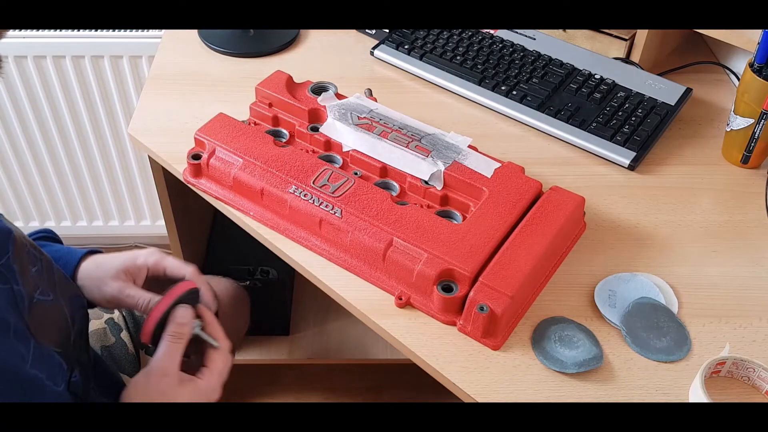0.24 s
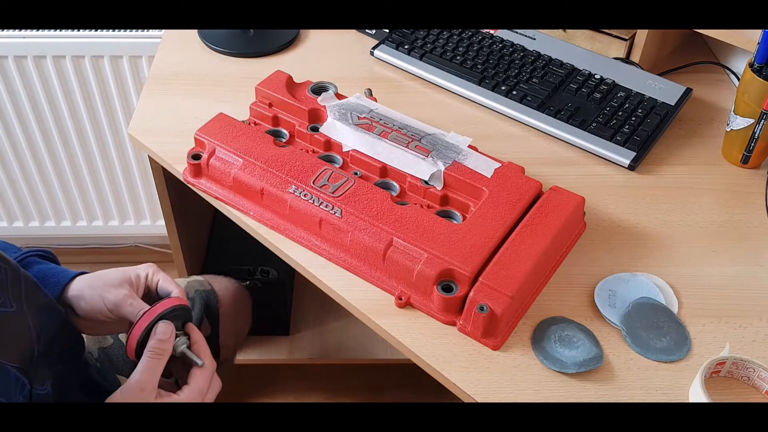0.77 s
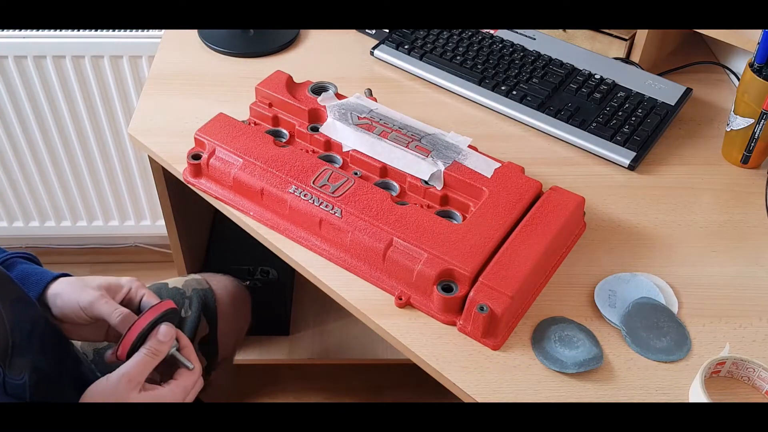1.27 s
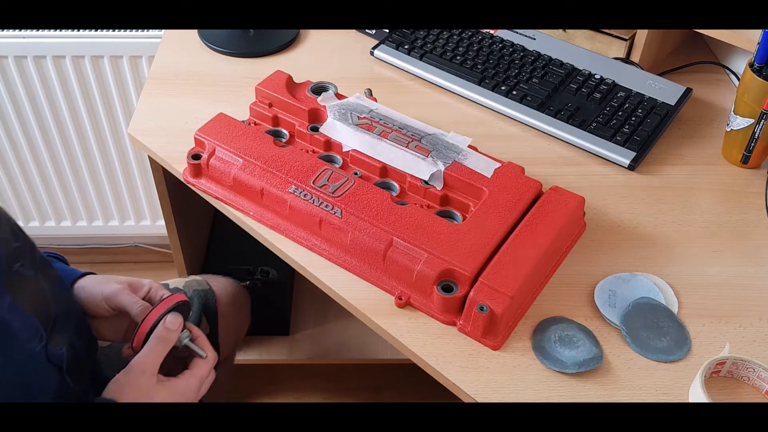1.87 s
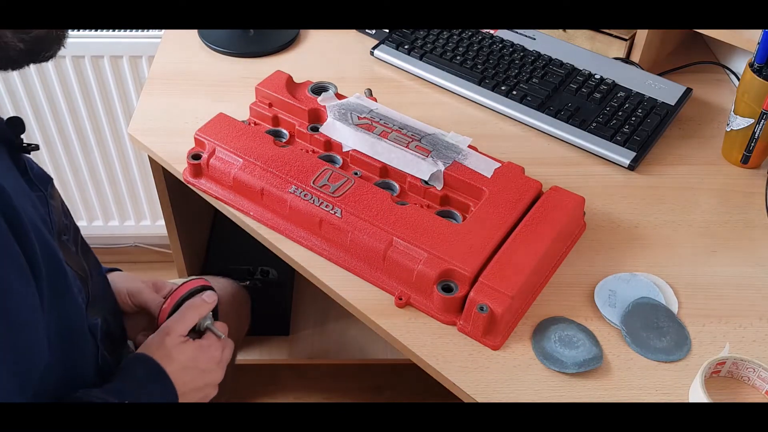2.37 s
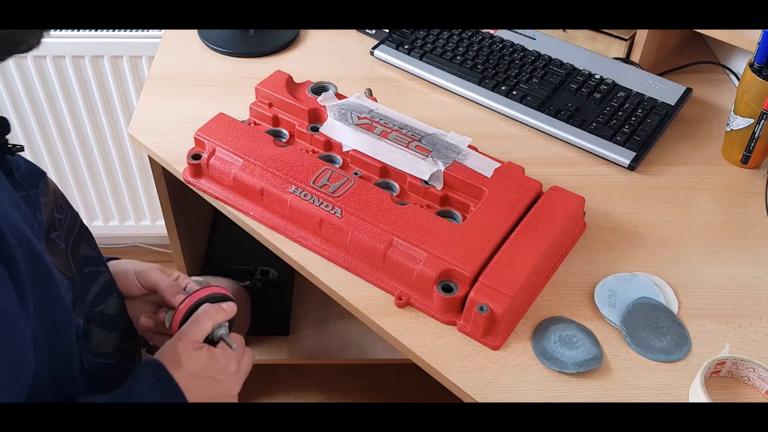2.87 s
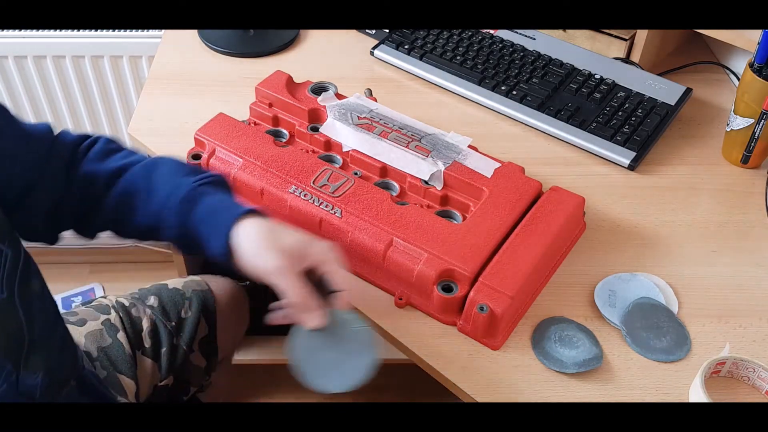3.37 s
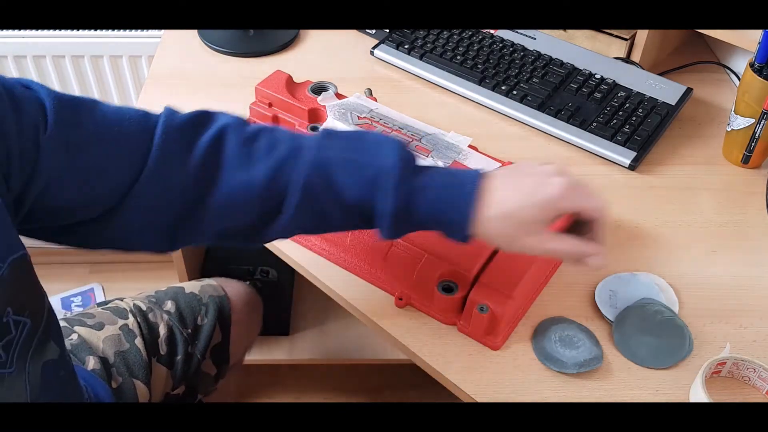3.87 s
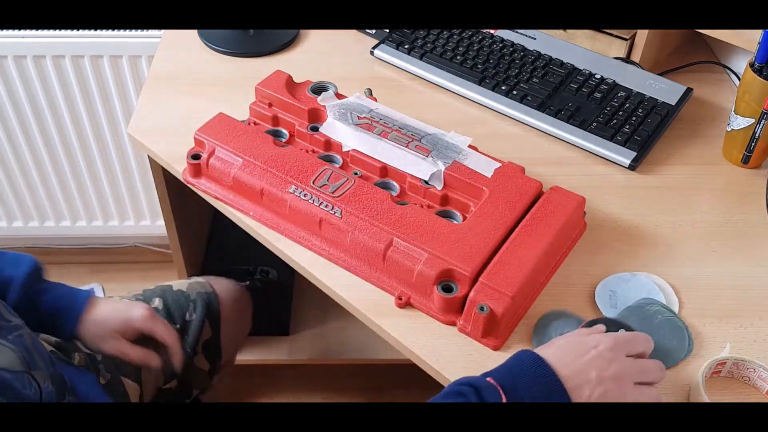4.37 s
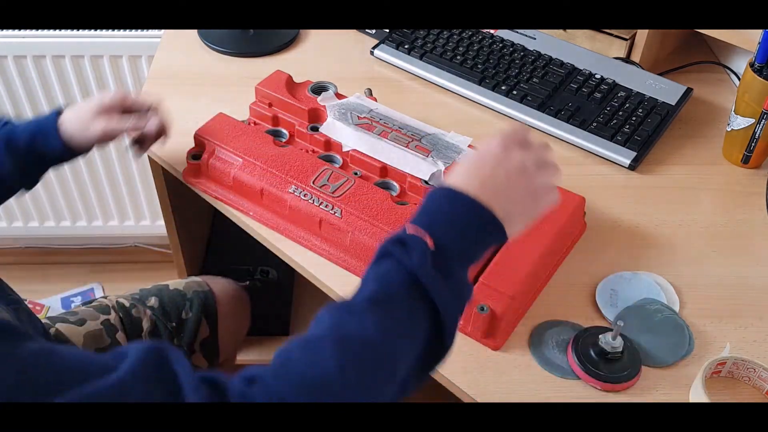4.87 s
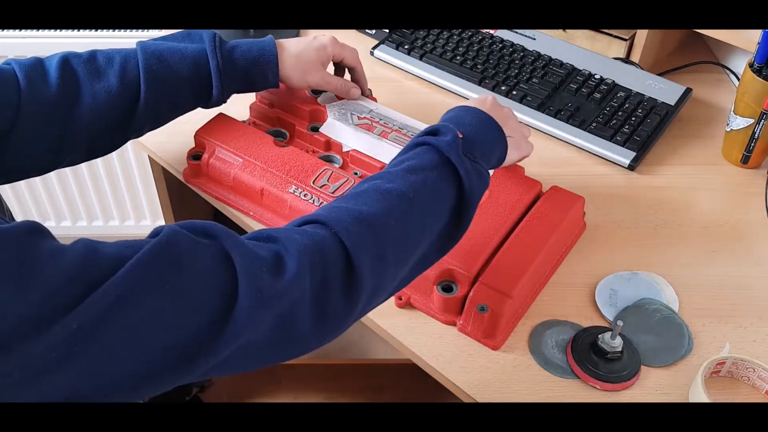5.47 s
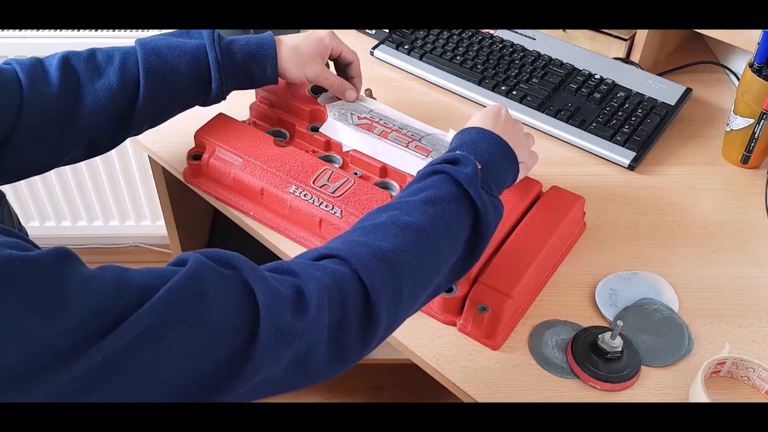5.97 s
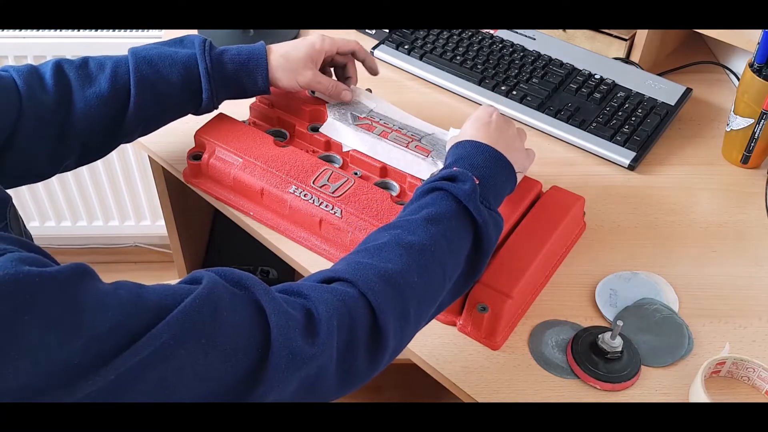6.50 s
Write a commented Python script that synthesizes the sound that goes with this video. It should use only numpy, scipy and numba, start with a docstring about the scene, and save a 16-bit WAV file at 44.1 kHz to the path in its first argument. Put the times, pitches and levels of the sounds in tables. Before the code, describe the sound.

A hook-and-loop sanding disc is ripped off its pad in crackling pulls ending in a sharp crack, then scuffs, a light knock and tape-picking crackle.

```python
"""At a desk in a small room with a low hum, someone rips a hook-and-loop sanding disc off its backing pad in pulls.
Hooks snap in sharp clicks; the same dense jolts ring the pad and swing the freed flap, whose note falls overall.
Scuffs, mostly of gritty faces, are filtered crackle, soft blows ring the desk's modes, and fingers pick at masking
tape on a painted metal cover with crackle, flicks and taps. The pad being picked up and then the sleeves rustle;
very faint thin tones glide in narrow noise bands; a noise tail gives the room."""
import sys
import numpy as np
from scipy import signal
from scipy.fft import rfft, irfft
from scipy.io import wavfile
from scipy.ndimage import uniform_filter1d
from numba import njit

SR = 44100
rng = np.random.default_rng(int(sys.argv[2]) if len(sys.argv) > 2 else 0)


def transcribe(signal):
    """Save signal, clipped to [-1, 1], as a 16-bit WAV file at the path in sys.argv[1]."""
    frames = np.atleast_2d(signal).T
    limited = np.clip(frames, -1, 1)
    pcm = np.round(limited * 32767).astype(np.int16)
    wavfile.write(sys.argv[1], SR, pcm)


N = 297234
TIME = np.arange(N) / SR

# the strongest hooks letting go: (time [s], level over 1 ms [dB])
STRONG_HOOKS = [(0.2517, -46.5), (.4897, -51.5), (0.8513, -41.5), (.88, -44.5), (0.894, -34), (0.9681, -23),
                (0.986, -18.5), (1.0002, -19), (1.019, -25), (1.1026, -28), (1.1097, -31), (1.1203, -27.5),
                (1.1266, -26), (1.1367, -29), (1.152, -16.5), (1.1576, -29), (1.2153, -22), (1.2243, -19.5),
                (1.2323, -27), (1.2962, -15.5), (1.2988, -24), (1.3047, -18.5), (1.3249, -25),
                (1.3859, -31), (1.443, -29), (2.3658, -35), (2.3977, -40), (2.4159, -23), (2.4204, -15),
                (2.446, -23.5), (2.4553, -22.5), (2.4626, -27), (2.4899, -28), (2.5277, -30.5),
                (2.5348, -22), (2.538, -23), (2.5477, -15), (2.5625, -14), (2.5718, -17), (2.5884, -12),
                (2.5976, -11), (2.6147, -13.5), (2.6318, -13), (2.7099, -29), (2.7269, -21.5),
                (2.7401, -12.5), (2.83, -18.5), (2.8465, -20), (2.9366, -21), (2.9566, -11.5),
                (2.9967, -16), (3.02, -16), (3.1388, -25.5), (3.1615, -16.5), (3.2387, -16)]
# relative spectrum of a snapping hook: (frequency [Hz], density [dB])
SNAP_SPECTRUM = [(300, -21), (1000, -20.5), (1650, -16), (2150, -16), (2600, -3), (3100, -7), (4100, -1),
                 (6500, -8), (8300, -3), (9700, -8.5), (12000, -4), (16000, -12.5)]


def undb(db):
    """Decibels to gain."""
    return 10 ** (np.asarray(db) / 20)


def unit(x):
    """Scale to rms 1."""
    return x / np.sqrt(np.mean(x ** 2))


def peaking(y, db):
    """Scale to a peak level."""
    return undb(db) * y / np.abs(y).max()


def add(out, s, sound):
    """Mix a sound in at time s."""
    i = max(int(s * SR), 0)
    out[i:i + len(sound)] += sound[:N - i]


def curve(rows, column):
    """One column of a table, joined by straight lines in time."""
    rows = np.array(rows)
    return np.interp(TIME, rows[:, 0], rows[:, column])


def walk(rate, count=4000):
    """Random levels, new ones `rate` times a second, joined by straight lines."""
    return np.interp(TIME * rate, np.arange(count), rng.standard_normal(count))


def stroke(start, length, build, ease, slack_db):
    """Gain of one pull: the force builds, holds and eases off."""
    rising = (TIME - start) / build
    falling = (start + length - TIME) / ease
    force = np.clip(np.minimum(rising, falling), 0, 1)
    inside = (TIME >= start) & (TIME <= start + length)
    return uniform_filter1d(inside * undb(slack_db * (1 - force)), size=220)  # 5 ms smoothing


def swells(rows):
    """Gain of short slides that speed up and die away."""
    gain = np.zeros(N)
    t = TIME[:SR // 2]
    for s, db, swell, fade in rows:
        rise = np.sqrt(np.minimum(t / swell, 1))
        fall = np.exp(-np.maximum(t - swell, 0) / fade)
        add(gain, s, undb(db) * rise * fall)
    return gain


def response(points, size=1024):
    """Causal impulse response of unit energy with the given spectrum."""
    hz, db = np.transpose(points)
    grid = np.maximum(np.fft.rfftfreq(size, 1 / SR), 1)
    cepstrum = irfft(np.log(undb(np.interp(np.log(grid), np.log(hz), db))))
    # fold the cepstrum forward: minimum phase, so the energy comes first
    cepstrum[1:size // 2] *= 2
    cepstrum[size // 2 + 1:] = 0
    h = irfft(np.exp(rfft(cepstrum)))
    return h / np.linalg.norm(h)


def through(x, h):
    """Pass a sound through an impulse response."""
    return signal.oaconvolve(x, h)[:len(x)]


@njit
def resonate(x, hz, width):
    """Band-pass whose centre and width move every sample; gain 1 at the centre."""
    y, band_state, low_state = np.empty(len(x)), 0., 0.
    for i in range(len(x)):
        g = np.tan(np.pi * hz[i] / SR)
        damping = width[i] / hz[i]
        v = (band_state + g * (x[i] + 1e-18 - low_state)) / (1 + g * (g + damping))
        band_state = 2 * v - band_state
        low_state = low_state + 2 * g * v
        y[i] = damping * v
    return y


def band(x, hz, width):
    """A fixed resonance."""
    return resonate(x, np.full(N, float(hz)), np.full(N, float(width)))


def steady(x, size=1100):
    """Hold the short-term power at 1 over `size` samples, keeping the fine grain."""
    return x / np.sqrt(np.abs(uniform_filter1d(x ** 2, size=size)) + 1e-9)


def burst(decay_s, size=256):
    """The uneven, sub-millisecond recoil of one fibre."""
    h = rng.standard_normal(size) * np.exp(-TIME[:size] / decay_s)
    return h / np.linalg.norm(h)


def crackle(rate, spread_db, decay_s, count=12, size=1100):
    """Random releases, `rate` a second, mostly small and a few large, from `count` kinds of fibre recoil."""
    out = np.zeros(N)
    for _ in range(count):
        place, chance = rng.random(size=(int(rate / count * N / SR), 2)).T
        sizes = undb(spread_db * np.minimum(-np.log1p(-chance), 4))
        releases = np.bincount((place * N).astype(int), sizes, N)
        out += through(releases, burst(decay_s))
    return steady(out, size=size)


def snap(hz, colour, ring_s, recoil, size=1024):
    """One release of unit energy: a sharp step, a brief ring and a ragged recoil."""
    t = TIME[:size]
    ring = np.cos(2 * np.pi * hz * t) * np.exp(-t / ring_s)
    ragged = burst(decay_s=0.00055, size=size)
    y = through(ring / np.linalg.norm(ring) + recoil * ragged, colour)
    return y / np.linalg.norm(y)


def hiss():
    """Soft treble noise of rms 1, from two band-passes in a row."""
    return unit(band(band(rng.standard_normal(N), 7800, 7000), 7800, 7000))


def background():
    """Still air as shaped noise, a faint hiss, and a low hum as narrow noise that wavers."""
    air_db, hiss_db, hum_db = -61, -85, -53.5  # short-term level for the hum, rms for the others
    hum_hz, hum_width_hz = 47.7, 11
    # relative spectrum of the air, ahead of the 62 Hz high-pass: (frequency [Hz], density [dB])
    air_spectrum = [(12, -33), (20, -2), (55, -1), (107, -6), (177, -10.5), (228, -9), (422, -23.5),
                    (472, -24), (607, -23.5), (1330, -38.5), (2080, -44.5), (4540, -47.5), (4940, -41.5),
                    (7950, -40), (16000, -50.5)]
    air = through(rng.standard_normal(N), response(air_spectrum, size=8192))
    air = unit(signal.sosfilt(signal.butter(4, 62, "high", fs=SR, output="sos"), air))
    hum = band(band(rng.standard_normal(N), hum_hz, hum_width_hz), hum_hz, 3 * hum_width_hz)
    return undb(air_db) * air + undb(hiss_db) * hiss() + undb(hum_db) * steady(hum, size=22000)


def thin_tones():
    """Very faint thin gliding tones: noise in narrow moving bands."""
    # (time [s], length [s], start [Hz], end [Hz], level [dB])
    tones = [(1.48, .12, 14300, 13800, -70), (1.58, .058, 10400, 9500, -75), (1.69, .06, 10100, 8600, -75),
             (4.64, .22, 1734, 1690, -82)]
    gain, glide = np.zeros(N), []
    for s, length, start_hz, end_hz, db in tones:
        add(gain, s, undb(db) * np.hanning(int(length * SR)))
        glide += [(s, start_hz), (s + length, end_hz)]
    hz = curve(glide, 1)
    note = resonate(rng.standard_normal(N), hz, 0.0092 * hz)
    return gain * steady(resonate(note, hz, 0.013 * hz))


def rustles():
    """The pad being picked up, then arm movements, crumple and swish as they speed up and slow."""
    # handling rustles, levels ahead of the uneven catching:
    # (fastest at [s], half-length [s], rustle level [dB], central resonance [Hz], swish level [dB])
    moves = [(.02, 0.045, -49.5, 430, -57), (.88, 0.21, -60.5, 430, -73), (1.45, .35, -56, 430, -79),
             (3.05, 0.5, -53, 474, -78), (4.4, 0.23, -68.5, 398.5, -70.5), (5.08, 0.13, -71, 540, -76.5),
             (5.55, .3, -69, 580, -97), (6.22, 0.37, -56, 600, -70), (6.72, 0.17, -65.5, 665, -70)]
    # relative spectrum of crumpling, ahead of its resonance: (frequency [Hz], density [dB])
    rustle_spectrum = [(100, -4), (250, 2.5), (450, 2), (750, -6), (1150, -3.5), (1600, -16), (4000, -24.5)]
    rustle_gain, swish_gain = np.zeros(N), np.zeros(N)
    for s, half, rustle_db, _, swish_db in moves:
        speed = np.exp(-((TIME - s) / half) ** 2)
        rustle_gain += undb(rustle_db) * speed
        swish_gain += undb(swish_db) * speed
    folds = through(crackle(rate=820, spread_db=1.0, decay_s=0.00034), response(rustle_spectrum))
    # higher when the sleeve drags over the cover
    hz = curve(moves, 3) * (1 + .12 * np.tanh(walk(rate=25)))
    rustle = steady(resonate(folds, hz, .55 * hz), size=4000)
    catching = undb(2 * walk(rate=30))
    return catching * (rustle_gain * rustle + swish_gain * hiss())


def masking_tape():
    """Glue lets go in a fine crackle; the paper flicks and fingertips tap the cover under it."""
    # short lifts of the tape off the paint: (time [s], crackle level [dB], swell [s], fade [s]),
    # ahead of the glue's own unevenness
    lifts = [(5.55, -76.5, .07, .06), (5.947, -54.5, .025, 0.28), (6.1, -43.5, 0.026, 0.044),
             (6.245, -52, 0.0063, 0.019), (6.3, -46.5, 0.013, 0.01), (6.42, -44, 0.0077, 0.028),
             (6.585, -58, 0.0056, 0.027), (6.665, -59.5, 0.011, 0.013), (6.72, -58, .005, .03)]
    # the paper edge flicks: (time [s], peak level [dB])
    flicks = [(5.975, -40), (6.039, -39), (6.141, -40), (6.315, -36), (6.428, -15)]
    # fingertips tap the cover: (time [s], peak level [dB])
    taps = [(5.947, -42), (5.976, -42), (6.039, -43), (6.102, -35), (6.112, -36.5), (6.17, -39),
            (6.249, -34.5), (6.261, -36), (6.315, -33), (6.324, -33.5), (6.415, -32), (6.429, -33.5),
            (6.651, -42.5), (6.725, -41)]
    # relative spectra of glue, paper edge and cover: (frequency [Hz], density [dB])
    glue_spectrum = [(710, -44), (1200, -7.5), (2270, -6), (2980, -3), (3290, -5), (7410, 1), (8910, -4.5),
                     (10800, 1.5), (16000, -12)]
    flick_spectrum = [(1000, -10), (2200, -11), (3300, -1), (4800, -0.5), (7000, 2.5), (9000, -6),
                      (12500, -5), (16000, -12)]
    tap_spectrum = [(100, -6.5), (280, 2), (550, -7.5), (800, -14), (1100, -2.5), (1450, -34),
                    (3000, -28.5)]
    flick_colour, tap_colour = response(flick_spectrum), response(tap_spectrum)
    glue = undb(2 * walk(rate=70)) * crackle(rate=700, spread_db=3.6, decay_s=.0009)
    out = swells(lifts) * through(glue, response(glue_spectrum))
    for s, db in flicks:
        add(out, s, peaking(snap(3700, flick_colour, ring_s=0.00032, recoil=3.9), db))
    for s, db in taps:
        # each fingertip lands on a different spot of the cover
        hz = rng.uniform(540, 773)
        add(out, s, peaking(snap(hz, tap_colour, ring_s=0.0034, recoil=0.92), db))
    return out


def desk():
    """Padded blows set the desk top ringing; a longer contact weakens its higher modes."""
    # soft blows on the desk, as drive into the modes: (time [s], level [dB], contact [s])
    knocks = [(.003, -35.5, .0065), (.255, -37.5, 0.0091), (4.394, -39, .008), (4.405, -33, 0.0031),
              (4.438, -34, 0.0064)]
    # desk modes, relative to the drive: (frequency [Hz], level [dB], decay by 60 dB [s])
    desk_modes = [(93.3, 1.5, 0.28), (136, -6, .15), (241, -11, .23), (490, -22, .03), (917, -8, .16),
                  (1305, 4.5, .07)]
    out, t = np.zeros(N), TIME[:SR // 2]
    ring = sum(undb(db - 60 * t / t60) * np.sin(2 * np.pi * hz * t) for hz, db, t60 in desk_modes)
    for s, db, contact in knocks:
        push = np.exp(-2 * t / contact)
        add(out, s, undb(db) * through(ring, push / push.sum()))
    return out


def sliding():
    """Abrasive grit scratches in fine dense grains and rings the disc; skin on the rim only hisses."""
    fizz_from_s, fizz_db = 4.38, -7.5  # grit that meets only the desk adds fizz; level against the scuff
    # scuffs, mostly of gritty faces, and one very faint slide: (time [s], level [dB], swell [s], fade [s])
    scuffs = [(.008, -42, .03, 0.017), (.058, -44, .004, 0.052), (1.77, -68.5, 0.013, 0.11),
              (3.33, -52.5, .02, .05), (3.41, -47, 0.089, .06), (3.53, -45.5, .018, 0.016),
              (3.594, -41.5, 0.012, .031), (3.692, -38.5, 0.013, 0.03), (3.768, -54.5, .004, 0.046),
              (4.039, -40.5, 0.012, 0.048), (4.383, -44, .007, 0.017), (4.399, -42, .018, 0.018)]
    # a thumb slides along the rim of the pad: (time [s], level [dB], swell [s], fade [s])
    rubs = [(.34, -60.5, 0.045, .028), (.51, -61, 0.042, .035), (1.82, -73, 0.048, .1),
            (2.01, -63.5, .05, 0.035), (2.165, -62.5, 0.055, .03), (2.31, -65.5, 0.11, .04)]
    # the stiff disc rings as it is dragged: (frequency [Hz], width [Hz], gain against the grit [dB])
    disc_modes = [(498, 40, -3), (2860, 76, -1.5), (3620, 130, -5), (6500, 530, -15), (8140, 780, -6),
                  (11200, 140, -12)]
    # relative spectra of grit, ahead of the disc's ring, and of skin: (frequency [Hz], density [dB])
    grit_spectrum = [(120, -54), (200, -11.5), (482, 1), (777, -12), (950, -5), (1250, -10.5), (2250, -6),
                     (2510, -8), (2800, -7), (3310, -12.5), (3620, -8.5), (4770, -9), (6760, -5.5),
                     (11300, -18), (16000, -62)]
    skin_spectrum = [(1500, -32.5), (2200, -26), (2700, -8), (3300, -7), (4500, 1), (6000, -13),
                     (11000, -17.5), (16000, -30)]
    grains = undb(1.5 * walk(rate=120)) * crackle(rate=7000, spread_db=3, decay_s=.00015)
    grit = through(grains, response(grit_spectrum))
    disc_ring = sum(undb(db) * band(grit, hz, width) for hz, width, db in disc_modes)
    grit = steady(grit + disc_ring)
    fizz = unit(band(band(grains, 12000, 7000), 12000, 7000))
    skin = through(crackle(rate=2500, spread_db=3.5, decay_s=0.00074), response(skin_spectrum))
    scratch = grit + undb(fizz_db) * (TIME > fizz_from_s) * fizz
    return swells(scuffs) * scratch + swells(rubs) * skin


def ripping():
    """Rows of hooks tear loose; the same jolts ring the pad and swing the freed flap, whose note glides."""
    # weaker hooks give way around each strong one: level against it, lead, swell, fade
    drag_db, drag_lead_s, drag_swell_s, drag_fade_s = -23, 0.0086, .005, .006
    tear_slack_db, flap_slack_db = -13.5, -10.5  # level at both ends of a pull, against full force
    flap_width, flap_skirt = .65, 1.2  # widths of the two band-passes, against the flap's note
    # pulls on the disc, levels ahead of the final trims: (time [s], length [s], build-up [s], ease-off [s],
    # tearing level [dB], flap level [dB], flap start [Hz], flap end [Hz], brightness [dB])
    pulls = [(0.97, 0.039, 0.016, 0.017, -28.5, -56, 1000, 900, 7),
             (2.529, 0.12, .045, 0.02, -27, -44.5, 540, 500, 0),
             (2.732, 0.047, 0.0054, 0.0081, -21, -38, 520, 500, -12),
             (2.778, 0.12, 0.02, 0.067, -20, -32.5, 620, 850, -3.5),
             (2.922, 0.059, 0.044, 0.0036, -20.5, -22, 900, 700, -4),
             (2.982, 0.084, 0.0026, .016, -20.5, -25.5, 450, 350, 1),
             (3.138, .045, 0.014, 0.0081, -29.5, -33, 330, 260, 6),
             (3.182, .095, 0.016, 0.027, -22, -32.5, 280, 90, 4)]
    # resonances of the pad: (frequency [Hz], width scale [Hz], relative gain [dB])
    pad_modes = [(506, 90, -2.5), (752.6, 12, 1.5), (950, 18, 1), (1200, 110, -6.5), (1380, 120, -2),
                 (1680, 170, -4)]
    # relative spectrum of tearing, ahead of the brightness: (frequency [Hz], density [dB])
    tear_spectrum = [(180, -49.5), (300, -27), (486, -14.5), (689, -2), (762, -18), (842, -4.5), (946, -14),
                     (1700, -0.5), (2200, -6.5), (3300, 0.5), (4990, 3), (6410, -6), (7820, -3.5),
                     (9550, -5.5), (14200, -7), (16000, -15)]

    drags = [(s - drag_lead_s, db + drag_db, drag_swell_s, drag_fade_s) for s, db in STRONG_HOOKS]
    tear_gain = swells(drags)
    flap_gain, glide = np.zeros(N), []
    for s, length, build, ease, tear_db, flap_db, start_hz, end_hz, bright_db in pulls:
        tear_pull = undb(tear_db) * stroke(s, length, build, ease, tear_slack_db)
        tear_gain = np.hypot(tear_gain, tear_pull)
        flap_gain = flap_gain + undb(flap_db) * stroke(s, length, build, ease, flap_slack_db)
        glide += [(s, start_hz, bright_db), (s + length, end_hz, bright_db)]
    glide = sorted(glide)
    flap_hz, brightness = curve(glide, 1), undb(curve(glide, 2))

    # the disc holds and gives, so the releases come in bunches a few milliseconds long
    bunches = undb(2.6 * walk(rate=260))
    jolts = bunches * crackle(rate=2000, spread_db=4, decay_s=.0004, count=20)
    tear = through(jolts, response(tear_spectrum))
    # each pull tears brighter or duller
    tear = steady(tear + (brightness - .8) * band(tear, 13000, 3200), size=800)
    flap = resonate(jolts, flap_hz, flap_width * flap_hz)
    flap = steady(resonate(flap, flap_hz, flap_skirt * flap_hz))
    pad = np.zeros(N)
    for hz, width, db in pad_modes:
        pad += undb(db) * band(band(jolts, hz, 2.13 * width), hz, 6 * width)
    pad = steady(pad)
    # the pad rings with the tearing, and less with the flap once its note is below 700 Hz
    coupling = np.minimum(flap_hz / 700, 1)
    pad_gain = undb(-15) * tear_gain + undb(-10) * coupling * flap_gain
    return undb(-0.7) * tear_gain * tear + undb(-3.5) * flap_gain * flap + pad_gain * pad


def hooks():
    """The strongest hooks snap; the harder the jolt, the stronger the three neighbours that follow within ms."""
    centre_hz, scatter_octaves = 5900, .17
    ring_s, recoil = 0.00011, .8  # recoil against the ring
    out, colour = np.zeros(N), response(SNAP_SPECTRUM)
    for s, db in STRONG_HOOKS:
        hz = centre_hz * 2 ** (scatter_octaves * rng.standard_normal())
        follow = np.interp(db, (-32, -14), (.2, .5))
        lags = np.array([0, .0004, .001, .002]) * rng.uniform(.6, 1.4, size=4)  # seconds
        shares = np.array([1, 1.3 * follow, follow, .6 * follow])
        shares /= np.linalg.norm(shares)  # split the level over the four snaps by power
        for lag, share in zip(lags, shares):
            add(out, s + lag, undb(db) * share * snap(hz, colour, ring_s=ring_s, recoil=recoil))
    return np.sqrt(SR / 1000) * out  # unit energy becomes rms 1 over 1 ms


def last_hook():
    """With nothing left to damp it, the last hook gives one clean, bright crack."""
    # the disc's edge whips free: (time [s], peak level [dB], ring [Hz])
    release = (3.2565, -2, 10500)
    out = np.zeros(N)
    s, db, hz = release
    add(out, s, peaking(snap(hz, response(SNAP_SPECTRUM), ring_s=.0001, recoil=.2), db))
    return out


def room(dry):
    """A reflection from the desk, quick scatter off the furniture, then the walls' tail."""
    # reverberation: (band centre [Hz], decay by 60 dB [s], level [dB])
    walls = [(250, 0.11, -8.5), (700, 0.87, -7.5), (1950, 0.86, -4), (5000, 0.77, -9.5), (9000, 0.41, -5),
             (14100, 0.31, -12.5)]
    t = TIME[:int(.7 * SR)]
    grid = np.log(np.maximum(np.fft.rfftfreq(len(t), 1 / SR), 1))
    noise = rfft(rng.standard_normal(len(t)))
    centres = np.log([row[0] for row in walls])
    h = np.zeros(len(t))
    # each row of the identity picks one band, crossfading into its neighbours
    for (_, t60, db), share in zip(walls, np.eye(len(walls))):
        scatter = 4.8 * undb(-60 * t / 0.17)
        onset = np.clip((t - .002) / 0.0016, 0, 1)
        fade = (undb(-60 * t / t60) + scatter) * onset
        band_noise = irfft(noise * np.interp(grid, centres, share), len(t))
        h += undb(db) * fade / np.linalg.norm(fade) * band_noise
    add(h, .0042, undb([-19]))  # desk reflection
    return dry + through(dry, h)


def scene():
    """Everything on the desk, heard in the room."""
    disc = hooks() + ripping() + last_hook() + sliding()
    others = thin_tones() + desk() + masking_tape() + rustles()
    return (room(disc + others) + background())[None]


def record(dry):
    """The microphone's signal, cut steeply above 16 kHz."""
    return signal.sosfilt(signal.ellip(10, .2, 80, 16000, fs=SR, output="sos"), dry)


dry = scene()
out = record(dry)
transcribe(out)
```